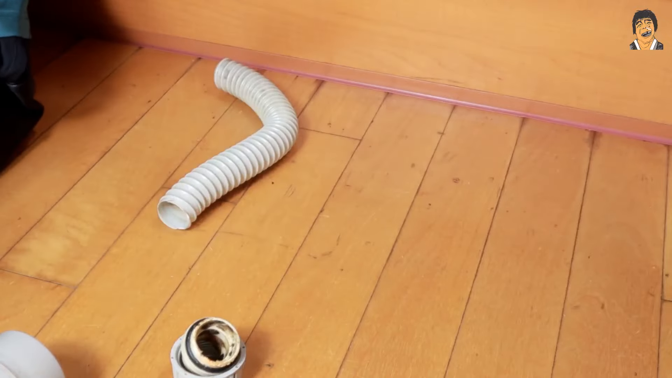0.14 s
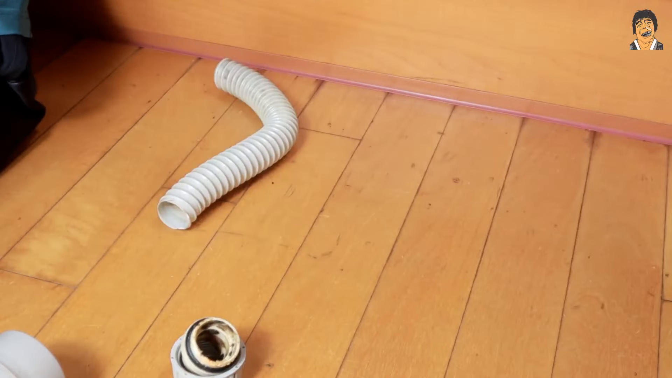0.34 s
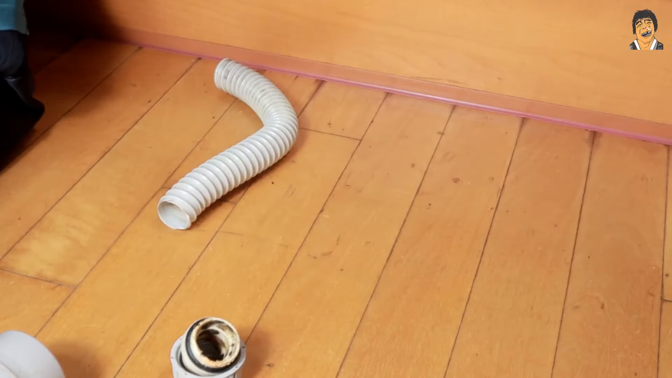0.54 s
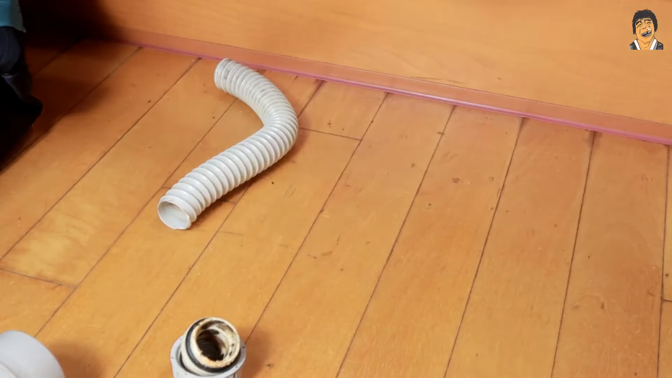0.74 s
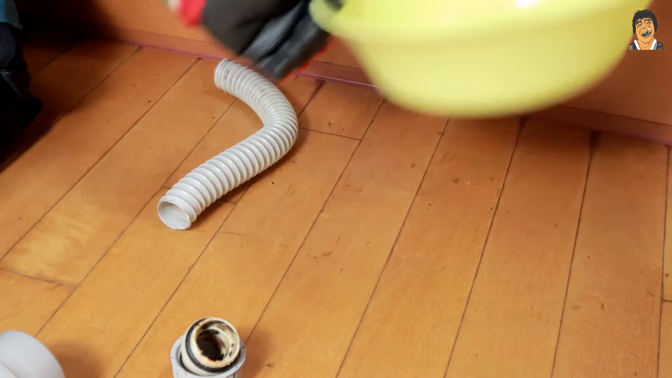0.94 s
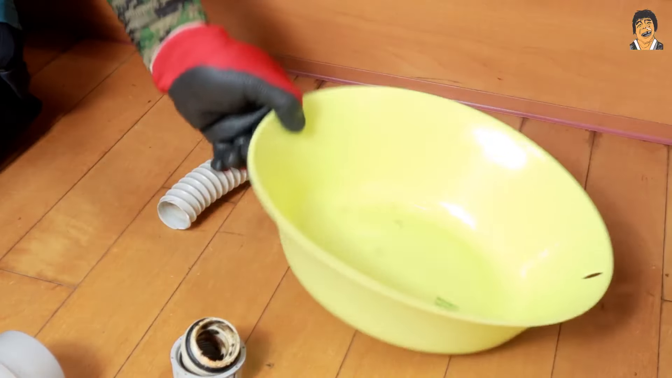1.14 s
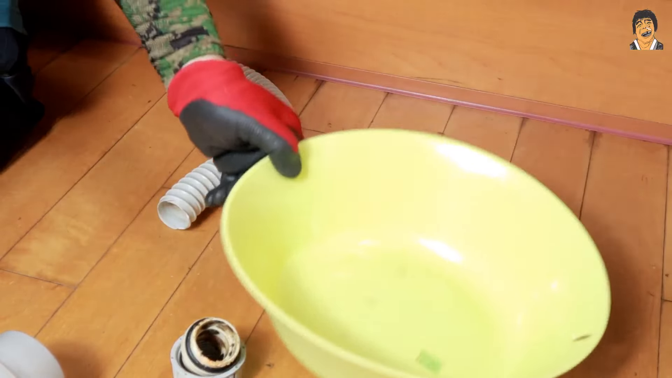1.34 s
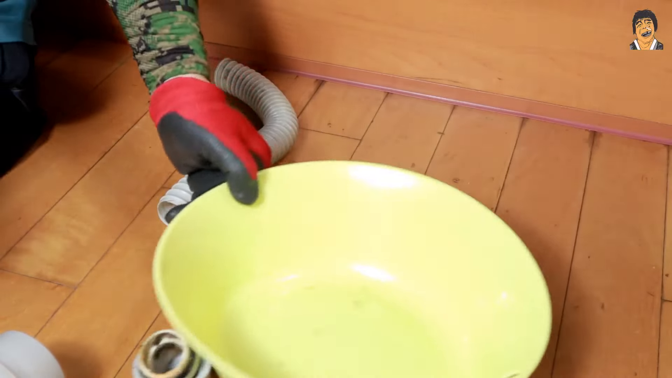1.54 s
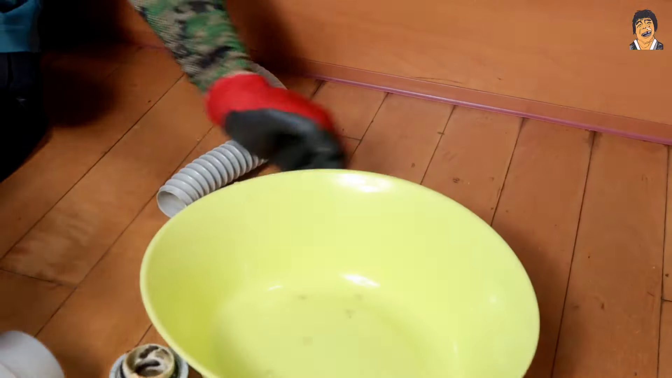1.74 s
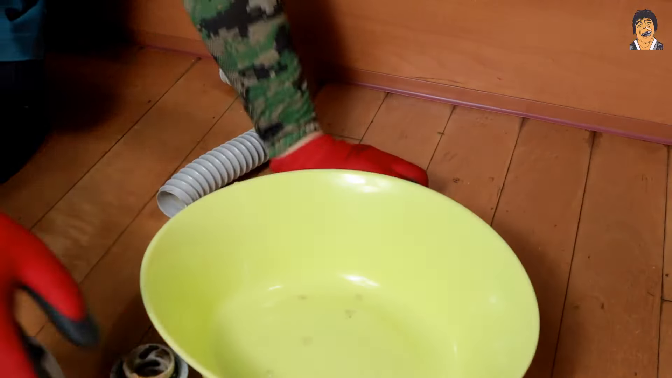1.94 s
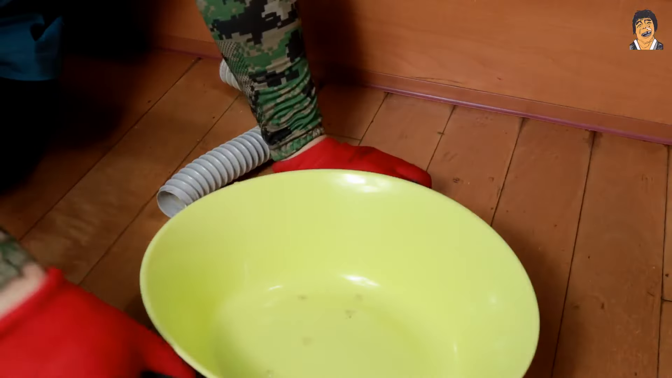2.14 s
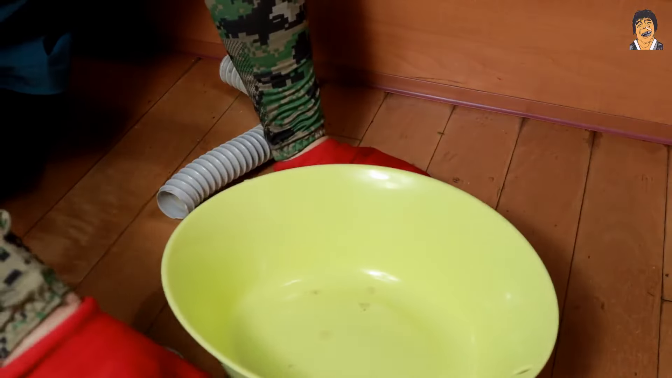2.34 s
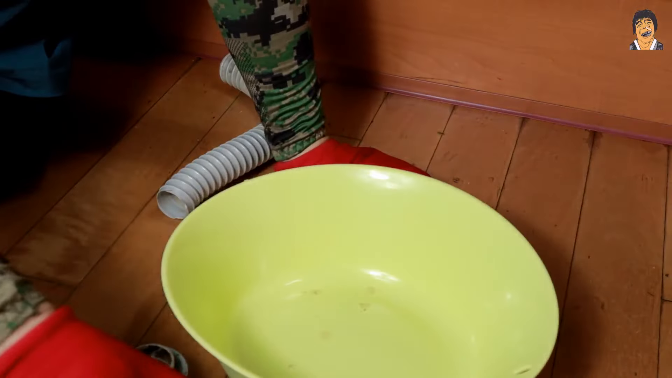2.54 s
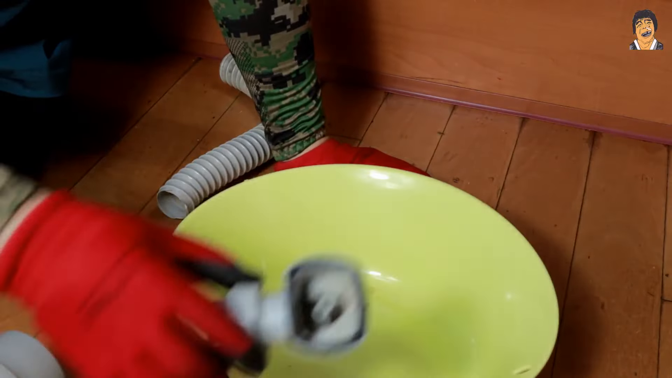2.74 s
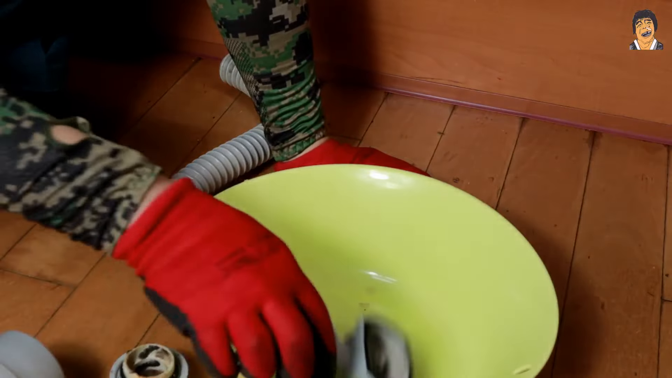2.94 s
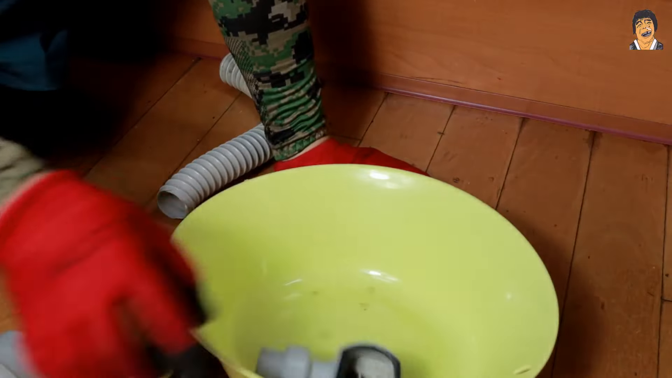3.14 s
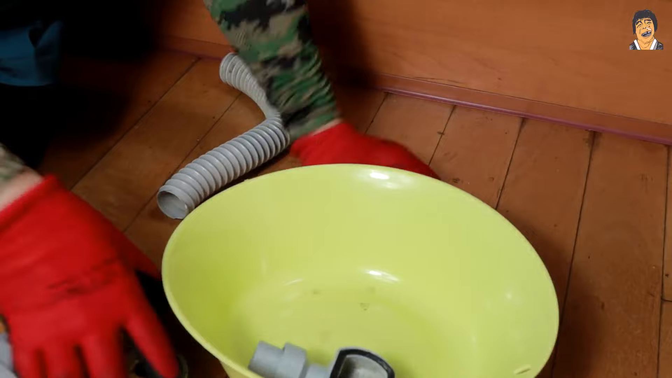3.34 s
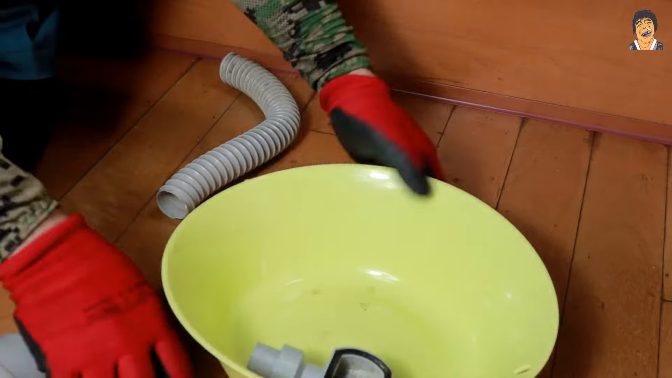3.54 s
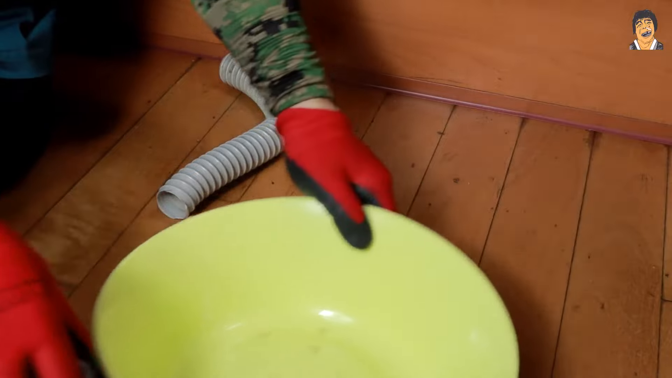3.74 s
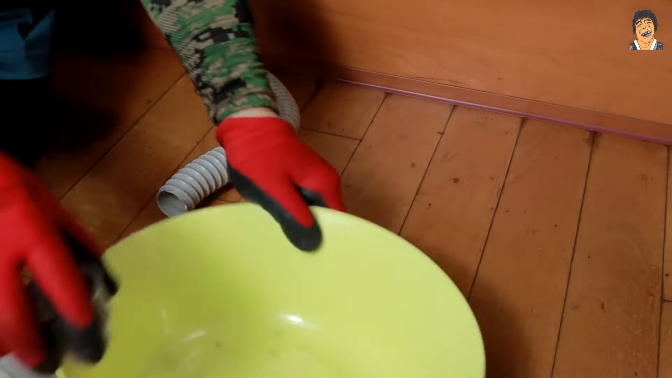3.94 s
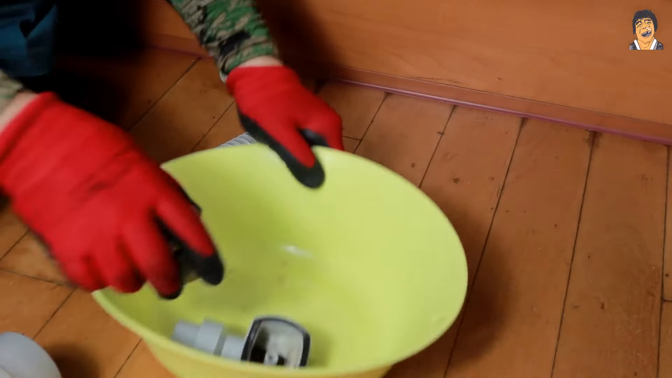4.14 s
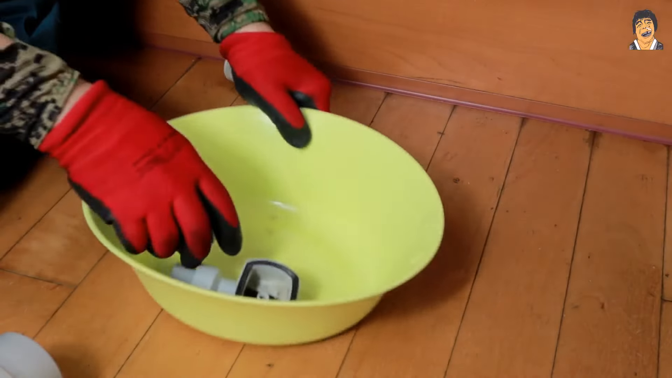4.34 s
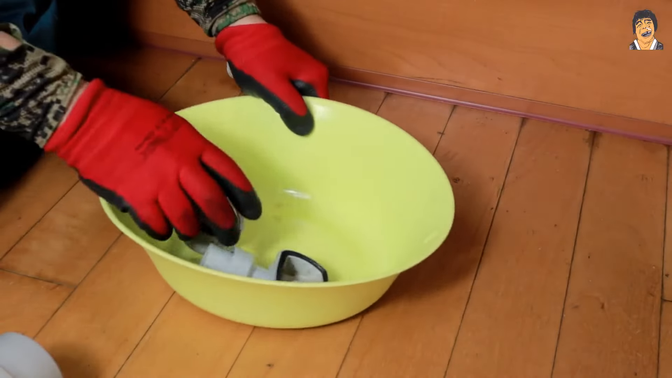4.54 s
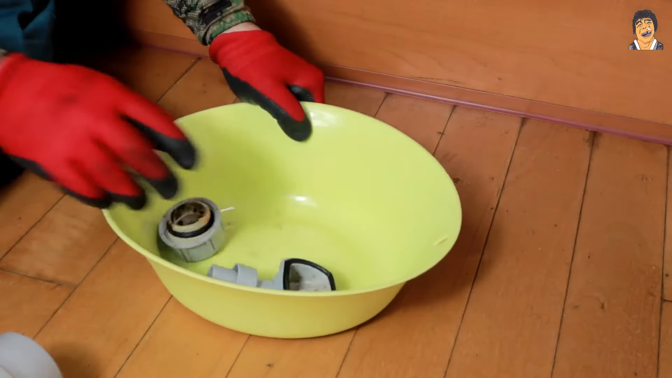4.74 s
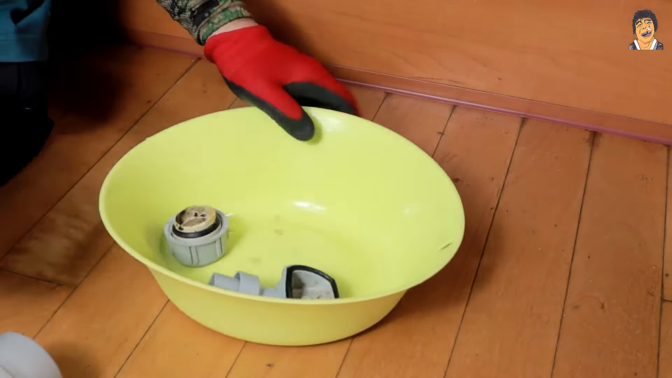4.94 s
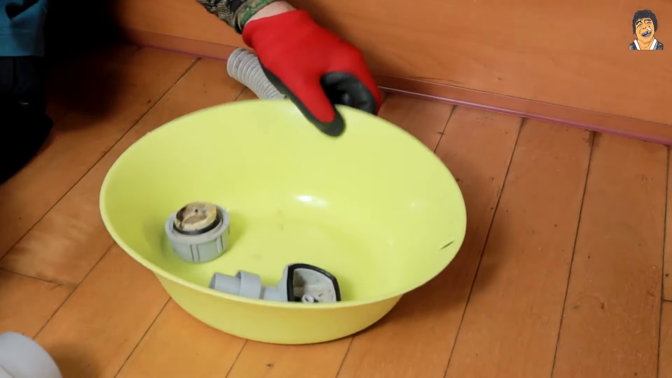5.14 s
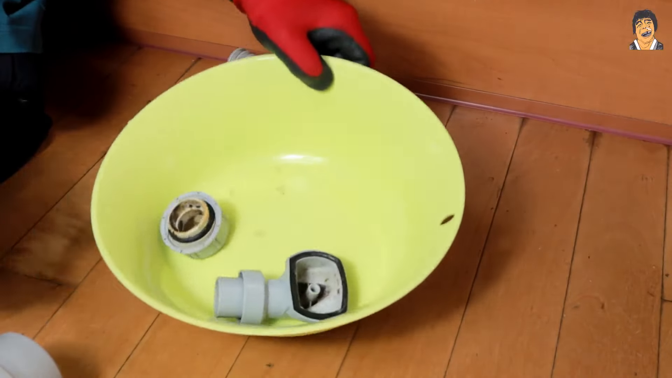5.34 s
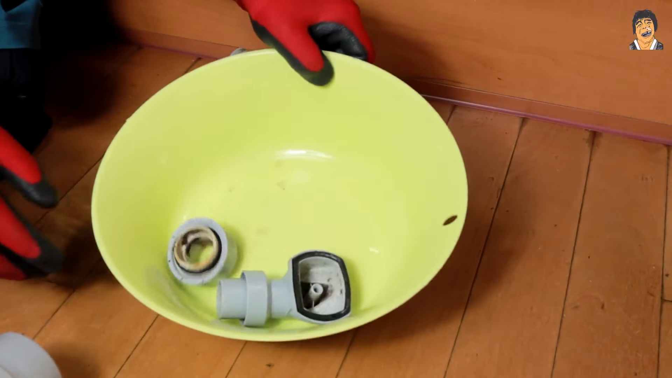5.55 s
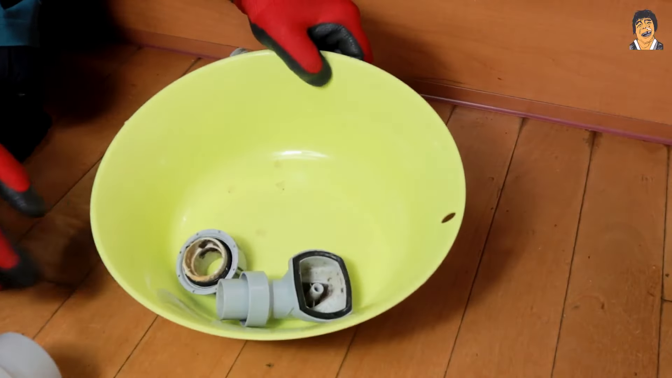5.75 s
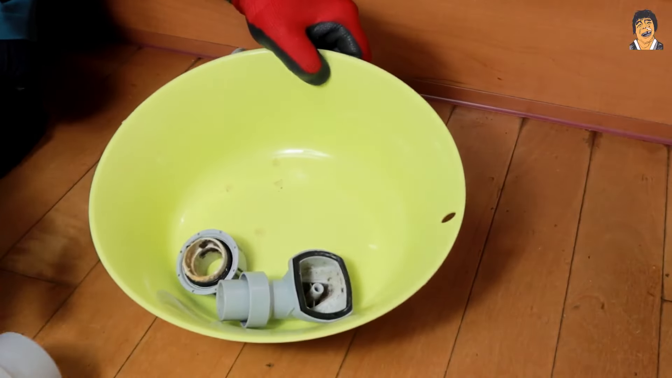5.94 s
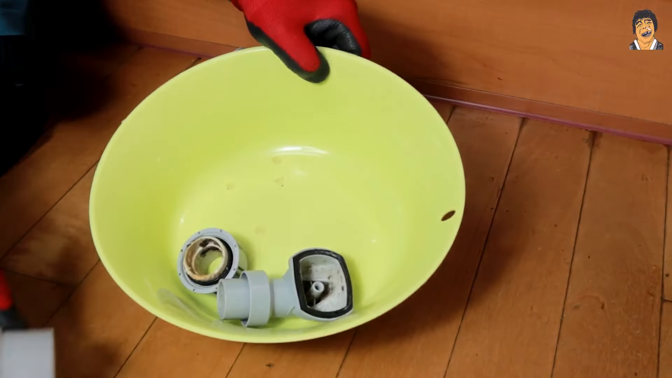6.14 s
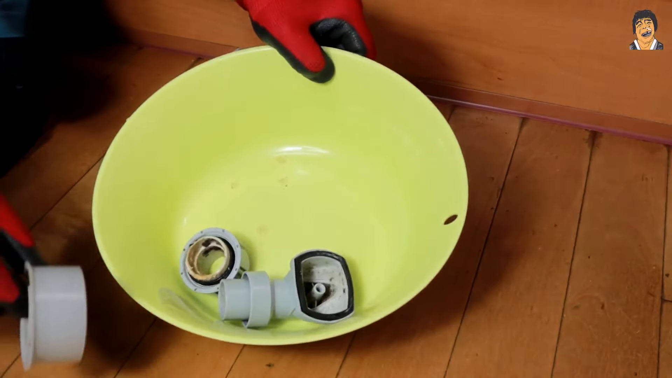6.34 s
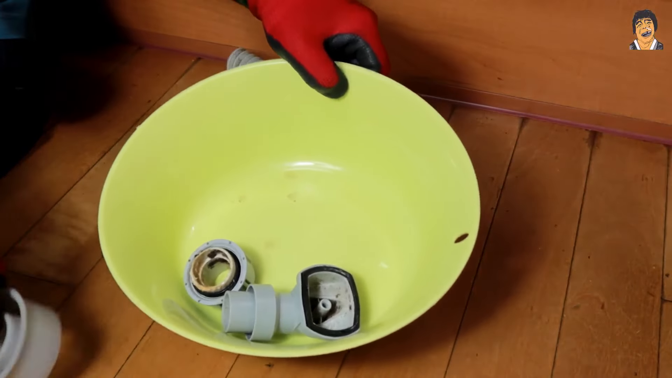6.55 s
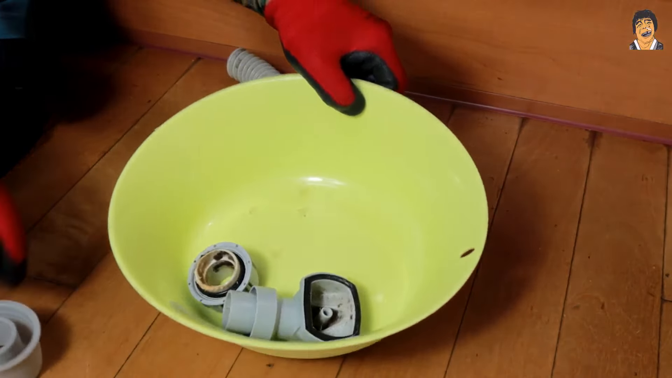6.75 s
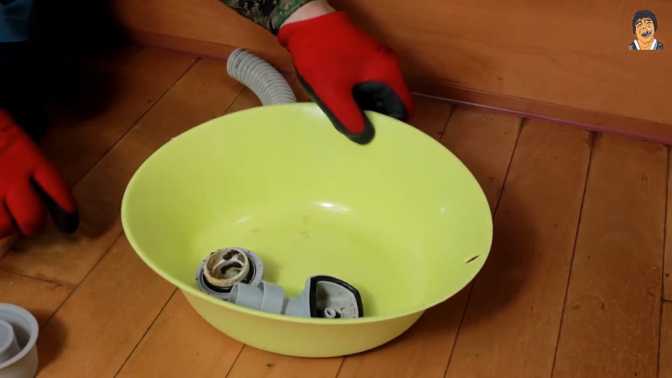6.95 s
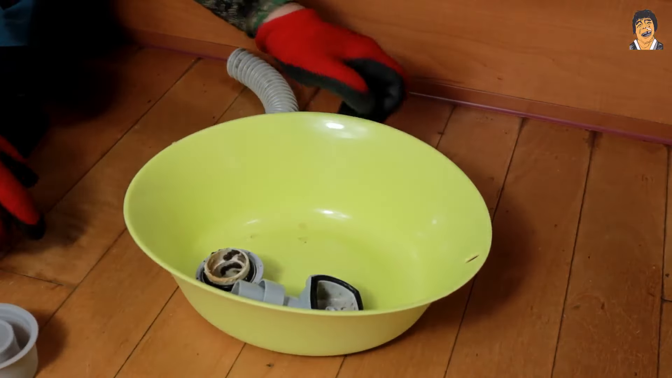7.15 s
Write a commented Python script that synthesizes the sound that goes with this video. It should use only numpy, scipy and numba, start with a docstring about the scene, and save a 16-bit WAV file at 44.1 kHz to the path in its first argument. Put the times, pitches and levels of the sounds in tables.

```python
"""Still air, a low hum and glove rub open a small wooden-floored room; light ticks, then hollow thumps
follow as a plastic basin is pulled out and dropped. A drain fitting falls in and bounces to rest, and
a nut slides about as a gloved hand tilts the basin. Knocks are noise snaps and ringing modes; slides
and rubs are dense random slips; shaped noise tails make the room. The close microphone overloads on
the hardest knocks and its gain control ducks the room behind them."""
import sys
import numpy as np
from scipy import signal
from scipy.fft import rfft, irfft
from scipy.io import wavfile
from scipy.ndimage import uniform_filter1d
from numba import njit

SR = 44100
rng = np.random.default_rng(int(sys.argv[2]) if len(sys.argv) > 2 else 0)


def master_out(mix):
    """Clip the mix to full scale and print it as 16-bit PCM to the path in sys.argv[1]."""
    frames = np.transpose(np.atleast_2d(mix))
    ceiling = np.clip(frames, -1, 1)
    pcm = np.round(ceiling * 32767).astype(np.int16)
    wavfile.write(sys.argv[1], SR, pcm)


N = 317520  # samples, 7.2 s

# Still air in the room: (frequency [Hz], density [dB per Hz, relative])
AIR_SPECTRUM = [(47, -27.5), (80, -14), (145, -6.5), (257, -4), (294, -5), (544, -12), (791, -15),
                (1030, -15), (1640, -26), (1910, -25.5), (3170, -26), (7660, -29.5), (15500, -30)]
# Glove and sleeve rub: (time of full swell [s], hold [s], level before the hiss trim [dB])
RUB_STROKES = [(.05, 0.85, -53.5), (.77, 0.065, -31), (1.375, 0.022, -42), (1.78, 0.019, -33.5),
               (2.36, 0.08, -49), (3.21, 0.11, -38), (3.74, 0.026, -37.5), (3.82, 0.47, -46),
               (4.25, 0.19, -39.5), (4.42, 0.21, -46), (4.73, 0.08, -37.5), (4.82, 0.21, -52),
               (5.4, 0.63, -53), (6.1, 0.74, -57), (6.8, 0.31, -48)]
# Tone of the rub, also used for the rim's rasp: (frequency [Hz], gain [dB])
RUB_TONE = [(200, -11), (900, 7), (2000, 5), (3500, 0.5), (5500, -4), (9000, -4), (13000, -5), (16000, -26)]

# Edges of the thump, hollow, body, knock, clack and tick bands: (frequency [Hz])
BAND_EDGES_HZ = [75, 140, 350, 1000, 2500, 6000, 15000]
# Attack colour of each kind of blow: one (level [dB]) per band, low to high
TICK_BANDS_DB = [-26.5, -8, -7, -10, -1, 1]
THUMP_BANDS_DB = [-11.5, -1.5, -2.5, -4, -6, -14.5]
KNOCK_BANDS_DB = [-39, -15, -2, -6, -15, -21.5]
LANDING_BANDS_DB = [-32, -19.5, -0.5, -4.5, -10, -18]
CLICK_BANDS_DB = [-36.5, -29, -7.5, -1.5, -4, -16.5]

# Light ticks on the basin's rim: (time [s], rattle t60 [s], level [dB])
RIM_TICK_TIMES = [(.1256, 0.15, -45.5), (.2037, 0.0051, -43), (.5101, .03, -48.5), (2.5262, .016, -57.5),
                  (3.771, .024, -36)]
# Plastic sliding on plastic and wood: (time of full swell [s], hold [s], level before the slide trim [dB])
SLIDE_STROKES = [(.39, 0.021, -28.5), (.965, 0.0074, -27), (1.34, .03, -29), (1.38, 0.023, -18.5),
                 (1.83, 0.044, -24), (2.38, 0.013, -44.5), (3.23, 0.17, -25.5), (3.96, 0.037, -29.5),
                 (4.23, 0.034, -26), (4.35, 0.23, -38), (4.73, 0.077, -26.5), (4.92, 0.088, -35),
                 (5.3, 0.01, -31), (5.43, 0.35, -34), (5.54, 0.042, -30), (5.786, 0.016, -18.5),
                 (6.95, 0.31, -62)]
# Basin pulled from its place:
# (time [s], rattle t60 [s], level [dB], hardness [dB per octave], weight [dB])
PULL_THUMPS = [(.4062, 0.074, -25, -2.3, -5), (.4589, .05, -36, -3.5, -1), (.5512, 0.043, -32, 1, -1.5),
               (.654, 0.048, -31, -1.5, -5.5), (.7154, .06, -22.5, -0.5, -9), (.7456, 0.073, -32, 1, 6),
               (.8633, 0.1, -15.5, .5, -0.5), (.8859, 0.022, -17, -3.5, 1), (.9593, 0.034, -17, -4, 7),
               (.9778, 0.11, -16.5, 1.23, -7)]
# Heavy, soft pushes flexing the boards or the basin's bottom:
# (time [s], frequency [Hz], level [dB], decay t60 [s])
SOFT_PUSHES = [(0.453, 101, -19.5, 0.2), (0.561, 99, -25.5, 0.35), (0.657, 102, -21, 0.29),
               (0.727, 106.7, -12.5, 0.19), (0.865, 235, -2.5, 0.1), (0.956, 171.4, -1, 0.11),
               (0.975, 188.2, -28.5, 0.6)]
# Rim scraping before the basin comes free: (time [s], level before the rim trim [dB])
RIM_SCRAPE = [(.71, -83.5), (.735, -48.5), (.78, -37), (.81, -34.5), (.855, -23), (.9, -33), (.94, -42.5),
              (.97, -72)]
# Basin meeting the floor and the hand:
# (time [s], rattle t60 [s], level [dB], hardness [dB per octave], weight [dB])
BASIN_HITS = [(1.3032, 0.052, -1, 1.14, -2.5), (1.5004, 0.019, -6.5, 1.43, -3),
              (1.5568, 0.0071, -13.5, -1, -5.5), (1.5796, 0.016, -24.5, -0.5, 2),
              (1.6215, 0.019, -26, 1.7, 3.5), (1.6802, 0.025, -34.5, 3.5, 8),
              (1.774, 0.13, -36.5, 3.5, 6.5), (1.8072, 0.03, -14.5, -1.26, -2),
              (1.8435, 0.028, -15, -2.5, 2), (1.8516, 0.03, -37.5, 4.5, 9), (2.3517, 0.078, -60, 7, 29.5),
              (2.4023, .035, -45.5, 3, -25), (2.6327, .02, -50.5, 0, -17), (3.7815, 0.11, -26, -2.5, -7),
              (3.9425, .043, -34, -1, 9), (3.9573, 0.011, -28, 2.5, 0.5), (3.9804, 0.041, -27, 0, -13),
              (4.0238, 0.036, -30, -2, 4.5), (4.1904, 0.19, -29.5, -0.5, -2), (4.2292, 0.14, -28, -2.5, 3),
              (4.2451, 0.12, -22, -3.5, 8), (4.4959, 0.012, -25, -2, 10), (5.2629, 0.12, -28.5, -2.5, 6)]
# Fittings landing and tumbling in the basin:
# (time [s], rattle t60 [s], level [dB], hardness [dB per octave], weight [dB])
FITTING_LANDINGS = [(3.1622, 0.048, -4, 2.3, 2.5), (3.219, 0.067, -22.5, 3, 6),
                    (3.322, 0.026, -8.5, 1.2, 1.5), (3.4141, 0.044, -17.5, 2, -2),
                    (3.4676, 0.013, -13, 0.5, 0), (4.6916, 0.099, -10.5, -0.2, -5.5),
                    (4.7105, 0.062, -18.5, 2.05, -6), (4.7496, 0.029, -19, -1.5, -15),
                    (4.7777, .058, -24, -0.3, -11), (4.8529, 0.18, -31, 0.2, 2),
                    (4.927, 0.36, -29, -1.1, -13), (4.9721, 0.055, -29, -1, -11),
                    (5.0433, .028, -36, -3, -15), (5.651, .04, -34, -4, -4),
                    (5.7713, 0.062, -31.5, 2.6, 10.5), (5.7802, 0.12, -23.5, -4, -1)]
# Fittings touching each other and the floor:
# (time [s], rattle t60 [s], level [dB], hardness [dB per octave])
FITTING_CLICKS = [(4.587, 0.043, -32, -5.5), (4.6261, .032, -39.5, -2), (6.7534, 0.034, -26.5, 3.5),
                  (6.8365, 0.037, -38.5, -2.5), (6.9111, 0.067, -36, 0.2), (6.9493, 0.069, -38, 3),
                  (6.9609, .04, -50, 0), (6.9734, .049, -38.5, -2.5), (7.0097, 0.03, -38, -0.5),
                  (7.0322, .029, -38.5, 2), (7.062, 0.13, -36, 0), (7.0866, 0.076, -18, -6.5),
                  (7.119, .016, -30.5, 0.3)]
# Two faint high sounds: (start [s], length [s], time of the top [s], top frequency [Hz],
# sag [Hz per s squared], peak level [dB])
HIGH_SQUEAKS = [(5.99, 0.33, 3.8, 12700, 140500, -55), (6.096, 0.2, 6.11, 11000, 125000, -61)]
# Squeaky scuffs as a fitting is picked up: (time [s], length scale [s], frequency [Hz], level [dB])
PICKUP_SCUFFS = [(6.205, 0.0039, 3250, -48.5), (6.243, 0.019, 3220, -48)]

# Modes of the held, empty and loaded basin, its bottom, its scraped rim and the fittings:
# (frequency [Hz], level before chance scatter [dB], decay t60 [s])
HELD_MODES = [(99.1, 3.5, 0.17), (190.4, -1, 0.54), (227.2, 5.5, 0.072), (308, -24, 0.17), (366, -2, 0.094),
              (480, 1.5, 0.064), (588, -19, 0.033), (684, -0.5, 0.013), (1131, -5.5, 0.1), (1720, 1, 0.055),
              (2562, 0.5, 0.051)]
EMPTY_MODES = [(253, -9.5, 0.096), (348, -9.5, 0.23), (402, -4, 0.13), (482, -14.5, 0.092),
               (462.4, -3, 0.13), (600, -11, 0.043), (737.5, 8, 0.059), (785, 0, 0.31), (946, -16, 0.46),
               (1093, -2.5, 0.29), (1190, -5.5, 0.3), (1450, -15.5, .06), (1898, -3.5, 0.043),
               (2447, -6, 0.025), (2790, -2, 0.033)]
LOADED_BASIN_MODES = [(423.5, -1, 0.071), (479, -9, 0.11), (603, -32, 0.23), (702, -1.5, 0.19),
                      (742.5, 3.5, 0.12), (765, 4.5, 0.06), (842, -7, 0.57), (1147, 0, 0.068),
                      (1222, 3.5, 0.08), (1650, -2.5, 0.15), (2064, -2, 0.07), (3270, -18, 0.04),
                      (3830, 7, 0.02)]
BOTTOM_PANEL_MODES = [(246, -2, 0.13), (448, -1, 0.074), (505, 5.5, 0.11), (604, -3.5, 0.055),
                      (810, 5, 0.075), (866, -3, 0.16), (1076, -14, .12), (1166, 3, 0.07),
                      (1458, -13, 0.026), (1773, -1, 0.05)]
RIM_MODES = [(1417, -1, 0.033), (1798, 5, 0.042), (2204, -7, 0.022), (2580, 1.5, 0.03), (3650, -4.5, .008),
             (4900, -4.5, 0.006), (7150, -11, .01)]
METAL_FREE_FITTING_MODES = [(509, 3, 0.086), (530, -30, 0.11), (881, 3, 0.061), (1120, -2, 0.28),
                            (1750, 10.5, 0.034), (1994, 10, 0.032), (2535, 5, .05), (2870, -4, 0.04),
                            (3020, 10.5, 0.028), (7560, 6, 0.0051)]
# Reverberation of the small room: (frequency [Hz], decay t60 [s], level [dB])
ROOM_BANDS = [(100, 0.37, -11), (300, 0.39, -9.5), (685, 0.42, -9.5), (1800, 0.48, -14),
              (4500, 0.34, -10.5), (11400, 0.45, -13)]

BASIN_PIVOT_HZ, FITTING_PIVOT_HZ = 590, 1580  # hardness acts above, weight below


def undb(db):
    """Decibels to gain."""
    return 10 ** (np.asarray(db) / 20)


def unit(x):
    """Scale to unit energy."""
    return x / np.sqrt(np.sum(x ** 2))


def level(x, db):
    """Scale to an rms level."""
    return x * undb(db) / np.sqrt(np.mean(x ** 2))


def fade(t, t60):
    """Exponential decay by 60 dB in t60 seconds, never faster than 2 ms."""
    return np.exp(-np.log(1000) * t / max(t60, .002))


def curve(rows):
    """Join (time, value) rows by straight lines, holding the end values."""
    return np.interp(np.arange(N) / SR, *np.transpose(rows))


def strokes(rows, attack_s, release_s):
    """Gain of a series of strokes: each swells, holds and dies away; the strongest one counts."""
    t = np.arange(N) / SR
    gains = []
    for full_s, hold_s, db in rows:
        swell = fade(np.clip(full_s - t, 0, 1), attack_s)
        release = fade(np.clip(t - full_s - hold_s, 0, 1), release_s)
        gains.append(undb(db) * swell * release)
    return np.max(gains, axis=0)


def walk(rate):
    """Smoothed random movement with an rms of one, redrawn at the given rate in Hz."""
    k = int(SR / rate)
    steps = np.repeat(rng.standard_normal(N // k + 1), k)
    smooth = uniform_filter1d(uniform_filter1d(steps, k), k)
    return level(smooth[:N], 0)


def colour(x, points):
    """Causal (minimum-phase) filter through (frequency [Hz], gain [dB]) points."""
    size = len(x)
    hz, db = np.transpose(points)
    f = np.maximum(np.arange(size // 2 + 1) * SR / size, 1)
    cepstrum = irfft(np.log(undb(np.interp(np.log(f), np.log(hz), db))), size)
    # folding the cepstrum forward gives the minimum phase
    cepstrum[1:size // 2] *= 2
    cepstrum[size // 2 + 1:] = 0
    return irfft(rfft(x) * np.exp(rfft(cepstrum)), size)


def attack_db(x):
    """Level of each band over its first 13 ms, or longer in the lowest bands."""
    spectrum, f = rfft(x), np.arange(len(x) // 2 + 1) * SR / len(x)
    levels = []
    for lo, hi in zip(BAND_EDGES_HZ, BAND_EDGES_HZ[1:]):
        band = irfft(spectrum * ((f >= lo) & (f < hi)))
        band = np.roll(band, 44)  # take in 1 ms of the band filter's pre-ringing
        window = int(max(.013, 2.5 / lo) * SR)
        levels.append(10 * np.log10(np.mean(band[:window] ** 2)))
    return np.array(levels)


@njit
def follow(x, attack, release):
    """Envelope that rises quickly and sinks slowly."""
    out, e = np.empty(len(x)), 0.
    for i in range(len(x)):
        e += (abs(x[i]) - e) * (attack if abs(x[i]) > e else release)
        out[i] = e
    return out


def ring(modes, scatter_db, detune, size=16384):
    """A body's modes; each contact weights and loads them differently."""
    t = np.arange(size) / SR
    chance = rng.standard_normal((len(modes), 3))
    tone = np.zeros(size)
    for (hz, db, t60), (weighting, sign, loading) in zip(modes, chance):
        mode = unit(np.sin(2 * np.pi * hz * (1 + detune * loading) * t) * fade(t, t60))
        tone += undb(db + scatter_db * weighting) * np.sign(sign) * mode
    return unit(tone)


def force_db(octaves, db, hardness=0, weight_db=0):
    """Spectrum of a blow, in octaves from the pivot: hardness tilts the treble, weight lifts the bass."""
    return db + hardness * np.maximum(octaves, 0) + weight_db * np.clip(-octaves, 0, 1)


def blows(table, colour_db, modes, ring_db, flex_db, flex_hz, flex_t60, snap, pivot_hz=BASIN_PIVOT_HZ):
    """Each contact is a snap and a brief rattle; the wall flexes in many damped modes, rings on in a few."""
    out = np.zeros(2 * N)
    centres = np.sqrt(np.multiply(BAND_EDGES_HZ[:-1], BAND_EDGES_HZ[1:]))
    contact_colour = [(30, -8.5), (100, -3.5), (700, -0.5), (3500, 2.0), (5500, -8.5), (14000, -18.5)]
    flex_colour = [(40, -30), (flex_hz / 3, -7), (flex_hz, 0), (3500, -12), (12000, -24)]
    for s, rattle_t60, *force in table:
        tone = ring(modes, scatter_db=2, detune=0.0052)
        t = np.arange(len(tone)) / SR
        contact = unit(rng.standard_normal(len(t)) * fade(t, rattle_t60))
        contact[0] += snap
        contact = unit(colour(contact, contact_colour))
        flex = unit(colour(rng.standard_normal(len(t)), flex_colour) * fade(t, flex_t60))
        hit = contact + undb(flex_db) * flex + undb(ring_db) * tone
        # the attack takes the colour of the object and of the force on it
        band_db = force_db(np.log2(centres / pivot_hz), *force) + colour_db
        for _ in range(2):
            hit = colour(hit, np.column_stack([centres, band_db - attack_db(hit)]))
        start = int(s * SR)
        out[start:start + len(hit)] += hit
    return out[:N]


def slips(per_s, spread_db):
    """Stick-slip: dense clicks of very uneven size."""
    struck = rng.random(N) < per_s / SR
    size = rng.standard_normal(N) * undb(spread_db * rng.exponential(size=N).clip(0, 4))
    return struck * size


def wandering(grains, modes, wander_db, detune, count=5):
    """Slips ring the modes; as the contact travels, one weighting of them gives way to the next."""
    total = np.zeros(N)
    for _ in range(count):
        weighted = grains * undb(wander_db * walk(28))
        total += signal.fftconvolve(weighted, ring(modes, scatter_db=0.5, detune=detune))[:N]
    return level(total, 0)


def background():
    """Still air as shaped noise, a low wavering hum and a faint rumble."""
    air = level(colour(rng.standard_normal(N), AIR_SPECTRUM), -53)
    waver = uniform_filter1d(uniform_filter1d(rng.standard_normal(N), size=6000), size=6000)
    hum = (1 + level(waver, -9)) * np.sin(2 * np.pi * 58.8 * np.arange(N) / SR)
    rumble_colour = [(20, -24), (40, -16), (58, -4), (85, -10.0), (300, -48.5)]
    rumble = level(colour(rng.standard_normal(N), rumble_colour), -66.5)
    return air + level(hum, -56) + rumble


def rubbing():
    """Rubber and cloth hiss over the plastic in dense, coloured slips."""
    hiss = level(colour(slips(per_s=4000, spread_db=2.5), RUB_TONE), -3.6)
    return hiss * strokes(RUB_STROKES, attack_s=0.17, release_s=0.15)


def rim_ticks():
    """Light touches on the rim excite the held basin's modes with very little snap."""
    return blows(RIM_TICK_TIMES, TICK_BANDS_DB, HELD_MODES, ring_db=3.5, flex_db=2.5,
                 flex_hz=450, flex_t60=0.12, snap=0.1)


def sliding(uneven_db=1.0):
    """Blunt slips keep the modes of the basin's bottom ringing under a wavering contact pressure."""
    grain_colour = [(30, -50), (80, -29.0), (300, 3.5), (800, 2.5), (2000, -2.0), (5000, -21.0),
                    (14000, -32.5)]
    grains = colour(slips(per_s=1600, spread_db=0.5), grain_colour)
    body = wandering(grains, BOTTOM_PANEL_MODES, wander_db=3, detune=0.018) + level(grains, -4)
    body = body * undb(uneven_db * walk(35))
    return level(body, -4.1) * strokes(SLIDE_STROKES, attack_s=0.12, release_s=.17)


def pull_thumps():
    """Knocks on the held basin excite its hollow modes as it is pulled from its place."""
    return blows(PULL_THUMPS, THUMP_BANDS_DB, HELD_MODES, ring_db=0.3, flex_db=-7.5,
                 flex_hz=450, flex_t60=0.28, snap=0.22)


def booms(push_s=0.014):
    """A slow push rings only one low mode."""
    out = np.zeros(N)
    for s, hz, db, t60 in SOFT_PUSHES:
        t = np.maximum(np.arange(N) / SR - s, 0)
        push = 1 - np.exp(-(t / push_s) ** 2)
        out += undb(db) * np.sin(2 * np.pi * hz * t) * push * fade(t, t60)
    return out


def rim_scraping():
    """Sharper slips rasp along the rim and ring its modes."""
    rasp = slips(per_s=900, spread_db=1.0)
    ringing = wandering(rasp, RIM_MODES, wander_db=4.5, detune=0.044)
    rim = ringing + level(colour(rasp, RUB_TONE), -9)
    return level(rim, 2) * undb(curve(RIM_SCRAPE))


def basin_knocks():
    """Floor and hand strike the empty basin with a strong snap, and its wall flexes and rings."""
    return blows(BASIN_HITS, KNOCK_BANDS_DB, EMPTY_MODES, ring_db=4.0, flex_db=5.5,
                 flex_hz=586, flex_t60=0.045, snap=0.67)


def settling(count=7):
    """Blows of a fitting that bounces to rest, ever quicker, weaker and duller."""
    first_s, flight_s, restitution = 3.536, .046, .77  # each flight is this share of the last
    rows = []
    for k in range(count):
        s = first_s + flight_s * (1 - restitution ** k) / (1 - restitution)
        # time [s], rattle t60 [s], level [dB], hardness [dB per octave], weight [dB]
        rows.append((s, .01, -15 - 2.5 * k, -0.2 * k, -4.5))
    return rows


def landings():
    """Fittings strike the basin from inside and ring its loaded modes, then one bounces to rest."""
    return blows(FITTING_LANDINGS + settling(), LANDING_BANDS_DB, LOADED_BASIN_MODES, ring_db=-2.5,
                 flex_db=0.5, flex_hz=755, flex_t60=0.023, snap=0.3)


def fitting_clicks():
    """Small, hard bodies meet and ring in their own short modes."""
    return blows(FITTING_CLICKS, CLICK_BANDS_DB, METAL_FREE_FITTING_MODES, ring_db=2.5, flex_db=0.5,
                 flex_hz=1410, flex_t60=0.19, snap=0.38, pivot_hz=FITTING_PIVOT_HZ)


def squeaks(unsteady=.02):
    """Fast stick-slip as unsteady sines: a folded, noisy hiss, and a thin tone that sags in pitch."""
    out, t = np.zeros(N), np.arange(N) / SR
    for s, length, top_s, top_hz, sag, db in HIGH_SQUEAKS:
        arch = top_hz - sag * (np.clip(t, s, s + length) - top_s) ** 2
        pitch = arch * (1 + unsteady * walk(900))
        along = np.clip((t - s) / length, 0, 1)
        swell = 2 * np.sqrt(along * (1 - along))
        out += np.sin(2 * np.pi * np.cumsum(pitch) / SR) * undb(db) * swell
    return out


def scuffs():
    """Rubber catches in short squeaks: noise through a narrow resonance."""
    out, t = np.zeros(N), np.arange(N) / SR
    for s, length, hz, db in PICKUP_SCUFFS:
        squeak = signal.lfilter(*signal.iirpeak(hz, 8, fs=SR), rng.standard_normal(N))
        out += level(squeak, db) * np.exp(-((t - s) / length) ** 2)
    return out


def contacts():
    """All knocks as radiated in one direction; each direction has its own fine colour."""
    return rim_ticks() + pull_thumps() + basin_knocks() + landings() + fitting_clicks()


def room(x, build_s, size=32768):
    """Reflections from near walls thicken into a short tail."""
    t = np.arange(size) / SR
    noise = rfft(rng.standard_normal(size))
    log_f = np.log(np.maximum(np.arange(len(noise)) * SR / size, 1))
    log_centres = np.log(np.array(ROOM_BANDS)[:, 0])
    build = 1 - np.exp(-(t / build_s) ** 2)
    tail = np.zeros(size)
    for share, (hz, t60, db) in zip(np.eye(len(ROOM_BANDS)), ROOM_BANDS):
        band = irfft(noise * np.interp(log_f, log_centres, share))
        tail += undb(db) * band * unit(fade(t, t60) * build)
    return signal.fftconvolve(x, tail)[:N]


def scene():
    """Knocks reach the microphone directly, off the nearby floor and wall, and later from across the room."""
    towards, away = contacts(), contacts()
    handling = rubbing() + sliding() + booms() + rim_scraping() + squeaks() + scuffs()
    near = undb(-3.5) * room(towards + handling, build_s=0.0022)
    far = undb(-1.5) * room(away + handling, build_s=0.014)
    return (background() + towards + handling + near + far)[None]


def record(dry, knee_db=-5, attack_s=0.0011, release_s=0.091):
    """Gain control ducks after loud knocks, too late for their first peaks, which clip; the top is soft."""
    sound = signal.sosfilt(signal.butter(3, 13500, fs=SR, output="sos"), dry)
    envelope = follow(sound[0], 1 / (attack_s * SR), 1 / (release_s * SR))
    gain = np.minimum(1, undb(knee_db) / (envelope + 1e-9))
    clipped = np.clip(sound * gain, -1, 1)
    return signal.sosfilt(signal.ellip(12, .2, 85, 15400, fs=SR, output="sos"), clipped)


dry = scene()
out = record(dry)
master_out(out)
```